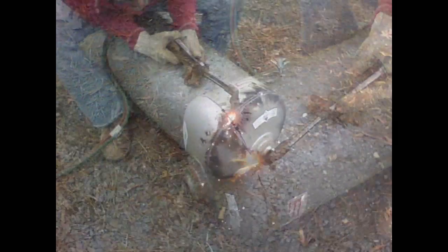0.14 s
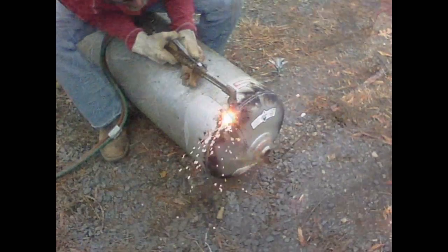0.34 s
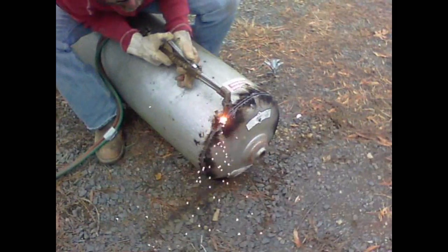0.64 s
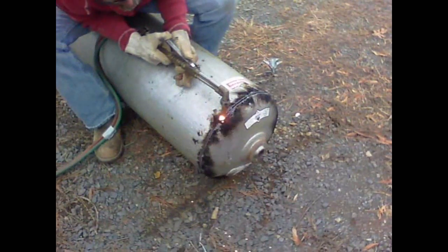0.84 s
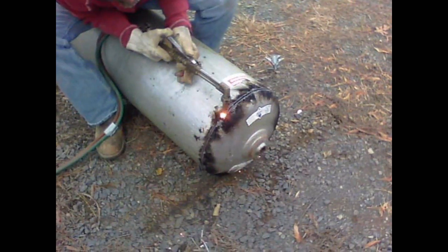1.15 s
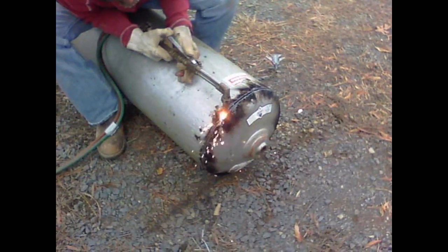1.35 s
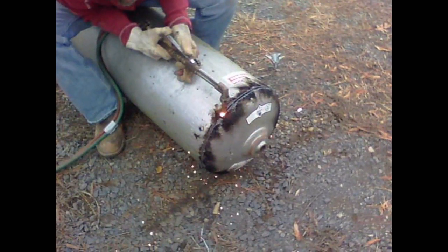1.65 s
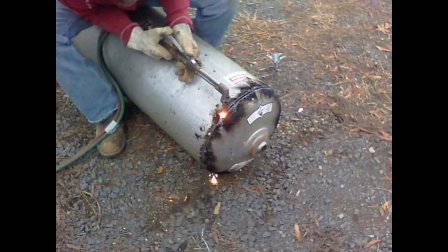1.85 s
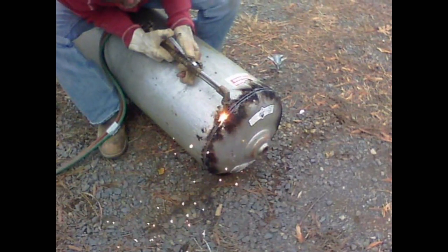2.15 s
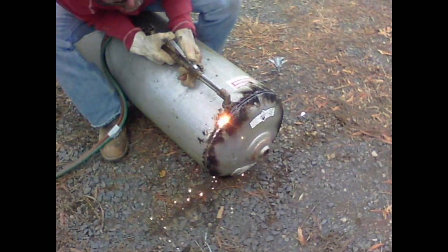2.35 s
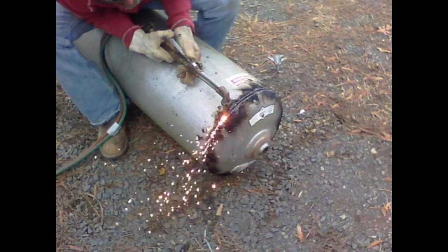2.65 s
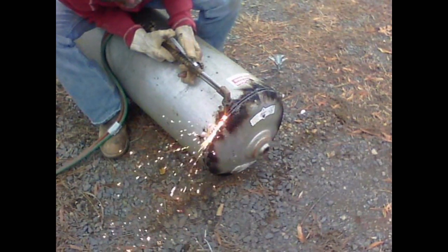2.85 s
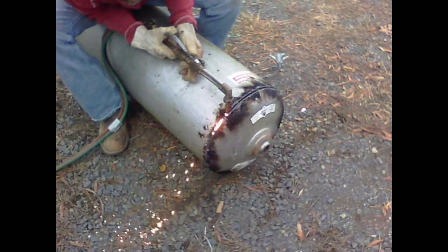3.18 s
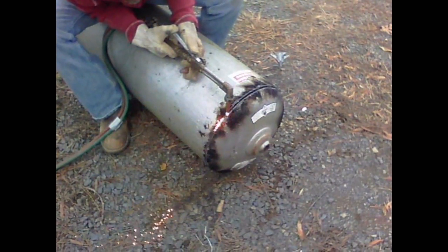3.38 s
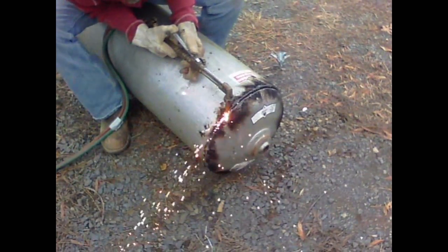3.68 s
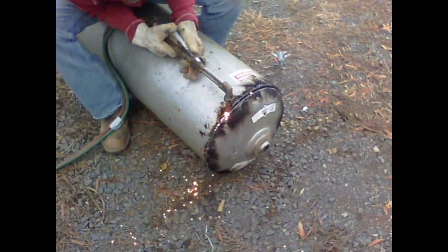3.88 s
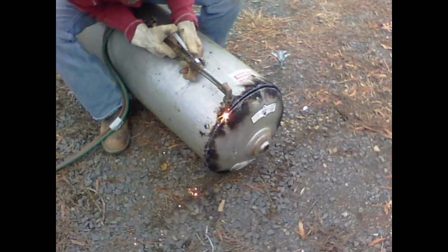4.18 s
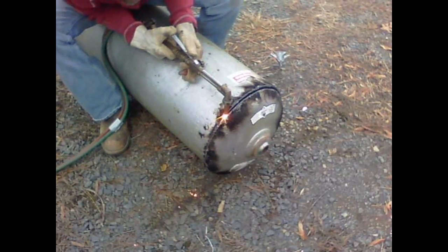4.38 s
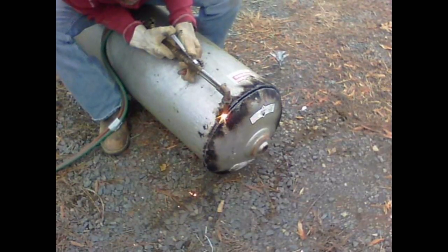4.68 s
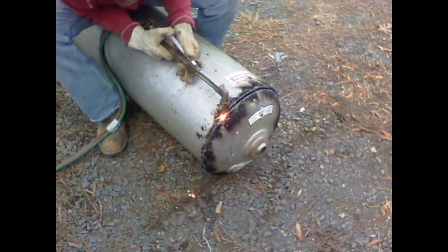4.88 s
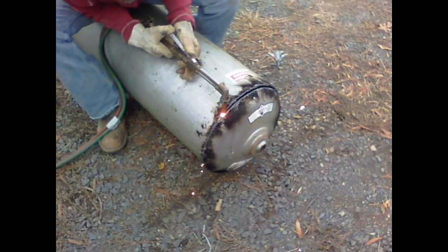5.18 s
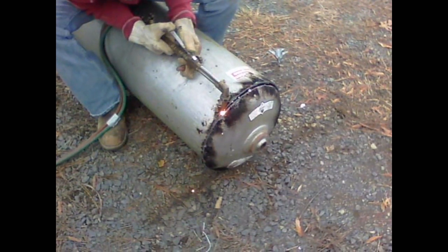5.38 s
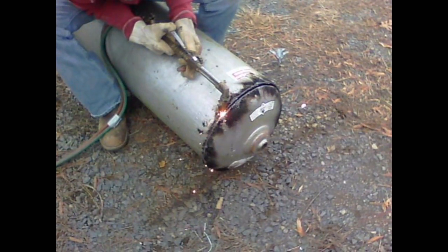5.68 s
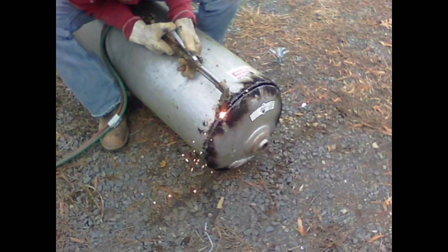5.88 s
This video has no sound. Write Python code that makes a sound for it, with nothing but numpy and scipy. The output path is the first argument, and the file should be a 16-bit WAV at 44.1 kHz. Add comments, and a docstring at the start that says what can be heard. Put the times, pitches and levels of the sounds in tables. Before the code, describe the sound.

Outdoors, over a faint low hum, a torch cuts a hollow steel tank with a rough hiss and sharp spits of slag. The hiss swells, then falls away to a gently blowing flame while sparks tick and the tank sings faintly three times. Then the hiss comes back strongly and the tank booms and thuds as it opens. The close, narrow-sounding microphone dulls the highs and crackles on the loudest moments.

```python
"""An oxy-fuel torch cuts the end off a steel tank in a yard, over a low hum. The oxygen jet hisses, roars in
the kerf and spits slag, coloured by the hollow tank; from 2.6 s it labours and grows louder. At 3.9 s the
oxygen is shut off for a second: the flame blows on, sparks tick and the tank sings three times. Then the
jet returns, breaks through into the tank at 5 s, and the low end booms and thuds. The camera's
narrow-band microphone dulls the top and distorts on the loudest stretches."""
import sys
import numpy as np
from scipy.fft import rfft, irfft, next_fast_len
from scipy.io import wavfile
from scipy.ndimage import map_coordinates

SR = 44100
rng = np.random.default_rng(int(sys.argv[2]) if len(sys.argv) > 2 else 0)


def generate_wav(sig):
    """Save sig (samples, or channels by samples) to the path in sys.argv[1] as 16-bit PCM at SR."""
    pcm = np.round(np.clip(np.atleast_2d(sig).T, -1, 1) * 32767).astype(np.int16)
    wavfile.write(sys.argv[1], SR, pcm)


N = 265834

# The background hum. Each row: pitch in Hz, level in dB.
HUM_TONES = [(59, -45), (72, -46), (145, -50), (216, -51)]
# Tone colours of the gas, and the microphone's response. Each row: frequency in Hz, relative level in dB.
FLAME_SPECTRUM = [(100, -6), (300, -5), (550, 1), (820, -1.5), (1000, -1.5), (1250, -2.5), (1680, -10.5),
                  (1920, -5.5), (2150, -11), (2450, -7.5), (3800, -13.5), (5000, -22)]
RUMBLE_SPECTRUM = [(15, -20.5), (45, -5), (60, -3), (72, 7), (88, 0.5), (110, -7.5), (140, -4.5),
                   (185, -11.5), (300, -19.5), (500, -24.5), (1500, -68)]
HISS_SPECTRUM = [(300, -25.5), (900, -25), (1700, -12.5), (2200, -6), (2700, -2), (3400, -1.5), (3900, 0.5),
                 (4600, 0.5), (5200, 1), (6000, -7)]
ROAR_SPECTRUM = [(150, -19.5), (330, -11.5), (400, 1), (560, -3), (810, -10.5), (1000, -5.5), (1250, -1.5),
                 (1680, -6.5), (1950, -1), (2200, -8), (3000, -3), (5000, -12)]
MIC_RESPONSE = [(20, -1), (5050, 1.5), (5250, -3.5), (5450, -12), (5600, -7), (5750, -17.5), (5950, -86.5),
                (6300, -110)]
# The tank's ringing modes. Each row: frequency in Hz, width in Hz, level in dB over the direct sound.
TANK_MODES = [(667, 14, 11.5), (753.7, 9.7, 17.5), (862, 14, 14.5), (983, 17, 5), (1120, 11, 5.5),
              (1204, 36, 5.5), (1292, 28, 6), (1406, 19, 9), (1535, 23, 9), (1930, 74, 1), (2424, 130, 1.5),
              (2980, 74, -2), (2970, 16, 7), (3470, 20, -11), (3835, 150, 1.5), (4313, 36, -14),
              (4670, 62, -6.5)]
SHELL_HZ = np.linspace(1600, 5400, 48) + rng.normal(0, 30, 48)  # the shell's crowded higher modes
# The air in the tank, closed and then cut open (higher and more damped).
# Each row: frequency in Hz, width in Hz, relative level in dB.
CLOSED_AIR_MODES = [(227.9, 13, 3.5), (261.3, 53, -9)]
OPEN_AIR_MODES = [(250.4, 61, 4), (305, 110, -9.5)]
# Notes the flame draws from the tank. Each row: centre in seconds, level in dB, length in seconds.
SUNG_NOTES = [(4.096, -52, 0.11), (4.36, -45, 0.15), (4.615, -49, 0.1)]
# Bursting sparks. Each row: start in seconds, relative level in dB.
SPARK_TICKS = [(4.252, -38), (4.364, -39), (4.489, -35), (4.623, -30.5)]
# Blasts of gas into the tank. Each row: centre in seconds, length in seconds, change of the boom in dB,
# thud level in dB, thud pitch in Hz.
GAS_BLASTS = [(0.475, 0.12, 7.5, -30.5, 72), (1.537, 0.22, 2, -35, 130), (2.08, 0.35, 4, -38, 125),
              (2.862, 0.079, 14, -36, 115), (3.238, 0.099, 6, -35, 70), (5.228, 0.13, 5, -29.5, 133.5),
              (5.445, 0.11, 1, -25, 75.7), (5.909, 0.08, -2, -16.5, 69.8), (5.98, 0.11, 7.5, -16.5, 134)]
# Short rushes of noise: slag spits, the oxygen coming back on, the tank roaring as it opens.
# Each row: start in seconds, level in dB, length in seconds, band centre and width in Hz.
KERF_GUSHES = [(0.098, -28.5, 0.026, 4000, 3000), (0.41, -25.5, 0.014, 4100, 2970),
               (0.463, -20.5, 0.04, 4180, 2000), (0.649, -24, 0.017, 4540, 2000),
               (0.98, -21, 0.02, 3900, 3040), (1.586, -21.5, 0.023, 3060, 4000),
               (2.045, -29, 0.04, 1300, 1500), (2.35, -33, 0.019, 4000, 3000),
               (2.618, -21.5, 0.031, 3800, 3000), (2.952, -19, 0.025, 3500, 4000),
               (2.954, -25, 0.021, 1260, 200), (3.244, -17.5, 0.016, 3000, 4080),
               (3.41, -25.5, 0.06, 1394, 2000), (3.605, -12.5, 0.029, 3960, 3000),
               (3.899, -17.5, 0.012, 4400, 2000), (4.804, -33, 0.078, 2900, 3030),
               (4.88, -16.5, 0.007, 4200, 2000), (4.919, -24, 0.016, 2680, 600),
               (4.947, -23, 0.027, 2300, 400), (5.002, -29.5, 0.055, 1300, 252),
               (5.94, -26.5, 0.037, 365, 298)]
# The cut runs smoothly, labours, then resumes after the pause.
# Each row: time in seconds, relative hiss level in dB, relative roar level in dB.
SMOOTH_CUT = [(0.0, -28, -34), (0.32, -26, -33), (0.43, -21.5, -30), (0.78, -24, -35), (2.01, -22.5, -32.5),
              (2.53, -25, -31), (2.56, -24.5, -33)]
LABOURED_CUT = [(2.63, -21.5, -26.5), (2.804, -22.5, -26), (2.946, -20.5, -22.5), (3.28, -18.5, -26),
                (3.326, -21, -33), (3.636, -13, -22), (3.826, -16, -26.5), (3.88, -23.5, -29.5)]
RESUMED_CUT = [(4.9, -23.5, -28), (5.154, -17.5, -31.5), (5.204, -15, -23), (5.438, -16, -29),
               (6.028, -13, -24.5)]

TIME = np.arange(N) / SR


def amp(db):
    """Decibels to gain."""
    return 10 ** (np.asarray(db) / 20)


def unit(x):
    """Scale to rms 1."""
    return x / np.sqrt(np.mean(x ** 2) + 1e-20)


def shape(points, hz):
    """An EQ curve: the gain of (Hz, dB) points joined on a log axis."""
    corner_hz, db = np.transpose(points)
    return amp(np.interp(np.log(hz + 1), np.log(corner_hz), db))


def wobble(rate):
    """A smooth random curve, rate knots a second."""
    return map_coordinates(rng.standard_normal(int(N * rate / SR) + 4), [np.arange(N) * rate / SR])


def swell(centre_s, length_s):
    """A smooth hump of height 1."""
    return np.exp(-(2 * (TIME - centre_s) / length_s) ** 2)


def filtered(x, response):
    """Filter x with a gain given as a function of frequency."""
    size = next_fast_len(N + SR // 2)
    return irfft(rfft(x, size) * response(np.fft.rfftfreq(size, 1 / SR)), size)[:N]


def noise(response):
    """Coloured noise of rms 1."""
    return unit(filtered(rng.standard_normal(N), response))


def resonance(modes, hz):
    """Summed power response of (Hz, width, dB) modes."""
    return sum(np.abs(amp(db) * hz * width / (centre * centre - hz * hz + 1j * hz * width)) ** 2
               for centre, width, db in modes)


def saturated(x, ceiling, hardness):
    """Round off the peaks at the ceiling."""
    return x / (1 + np.abs(x / ceiling) ** hardness) ** (1 / hardness)


def oxygen_flow(shut_s=3.917, open_s=4.88, bleed_db_per_s=194, build_db_per_s=319, leak_db=-31.5):
    """Share of full flow: with the lever up the hose bleeds to a leak; pressed again, the jet builds."""
    db = np.maximum(bleed_db_per_s * (shut_s - TIME), build_db_per_s * (TIME - open_s))
    return np.minimum(amp(np.minimum(db, 0)) + amp(leak_db), 1)


def breakthrough(start_s=5.0, rise_s=0.12):
    """How far the jet has broken through into the tank, 0-1."""
    return np.clip((TIME - start_s) / rise_s, 0, 1)


def cut_envelopes():
    """Gains of the jet's hiss and the kerf's roar with the lever fully down."""
    times, *levels = np.transpose(np.vstack([SMOOTH_CUT, LABOURED_CUT, RESUMED_CUT]))
    return [amp(np.interp(TIME, times, db)) for db in levels]


def hum():
    """A bed of low, slightly unsteady tones."""
    tones = np.zeros(N)
    for hz, db in HUM_TONES:
        phase = 2 * np.pi * np.cumsum(hz + 1.1 * wobble(5.6)) / SR
        tones += amp(db) * unit(np.sin(phase) * amp(2.2 * wobble(3.5)))
    return tones


def air_puffs():
    """Moving air pushes on the microphone in the deepest bass, more so when the kerf roars."""
    _, roar_gain = cut_envelopes()
    push = np.hypot(amp(-41.5), 0.25 * oxygen_flow() * roar_gain)
    air = noise(lambda hz: shape([(4, -25), (12, 0), (32, -2), (50, -9), (120, -35), (600, -80)], hz))
    return push * amp(1.6 * wobble(1.7)) * air


def flame():
    """The preheat flame blows softly; its turbulent rumble grows with the oxygen and the breakthrough."""
    blow = amp(-45.5 + 0.7 * wobble(40)) * noise(lambda hz: shape(FLAME_SPECTRUM, hz))
    rumble_db = -37 - 5 * (1 - oxygen_flow()) + 9 * breakthrough() + 1.1 * wobble(6.4)
    return blow + amp(rumble_db) * noise(lambda hz: shape(RUMBLE_SPECTRUM, hz))


def tank_singing(pitch_hz=992, sag_hz_per_s=110):
    """The flame blows across the edge of the cut and one tank resonance sings, a rough, sagging tone."""
    tones = np.zeros(N)
    for centre_s, db, length_s in SUNG_NOTES:
        hz = pitch_hz - sag_hz_per_s * (TIME - centre_s) + 13 * wobble(70)
        rough_tone = np.sin(2 * np.pi * np.cumsum(hz) / SR) * amp(2 * wobble(50))
        tones += amp(db) * swell(centre_s, length_s) * unit(rough_tone)
    return tones


def sparks(ring_hz=3800, decay_s=0.00021):
    """Each spark bursts with a tick of a cycle or two."""
    ticks = np.zeros(N + SR)
    t = np.arange(SR // 100) / SR
    tick = np.exp(-t / decay_s) * np.sin(2 * np.pi * ring_hz * t)
    for start_s, db in SPARK_TICKS:
        ticks[round(start_s * SR):][:len(t)] += amp(db + 8.5) * tick
    return ticks[:N]


def blast_thuds(relative_width=0.67):
    """Each blast of gas into the tank thuds: a short swell of low noise."""
    thuds = np.zeros(N)
    for centre_s, length_s, _, db, pitch_hz in GAS_BLASTS:
        band = [(pitch_hz, relative_width * pitch_hz, 0)]
        thuds += amp(db) * swell(centre_s, length_s) * noise(lambda hz: resonance(band, hz))
    return thuds


def gushes():
    """Short rushes of gas or slag: each has its own band of noise, swells fast and dies away."""
    bursts = np.zeros(N + SR)
    t = np.arange(SR // 4) / SR
    hz = np.fft.rfftfreq(len(t), 1 / SR)
    for start_s, db, length_s, centre_hz, width_hz in KERF_GUSHES:
        band = np.sqrt(resonance([(centre_hz, width_hz, 0)], hz))
        rush = unit(irfft(rfft(rng.standard_normal(len(t))) * band, len(t)))
        age = 2 * t / length_s
        bursts[round(start_s * SR):][:len(t)] += amp(db) * age * np.exp(1 - age) * rush
    return bursts[:N]


def tank_air(modes):
    """Noise of rms 1 ringing in the hollow of the tank."""
    low_band = [(100, -38), (205, -2), (320, -3), (550, -14)]
    return noise(lambda hz: np.sqrt(resonance(modes, hz)) * shape(low_band, hz))


def tank_boom():
    """The jet makes the tank's air boom: it surges with blasts, and is louder and higher once cut open."""
    opened = breakthrough()
    surge_db = sum(db * swell(centre_s, length_s) for centre_s, length_s, db, _, _ in GAS_BLASTS)
    boom_db = -36 + 7.5 * opened + surge_db + 1.76 * wobble(12)
    air = np.sqrt(1 - opened) * tank_air(CLOSED_AIR_MODES) + np.sqrt(opened) * tank_air(OPEN_AIR_MODES)
    return np.sqrt(oxygen_flow()) * amp(boom_db) * air


def wall_reflection(x, delay_s=0.001634, sway=0.028):
    """A bounce off the tank wall combs the sound; its path shifts a little as the hand moves."""
    strength = 0.29 * swell(centre_s=3.8, length_s=3.3)  # strongest while the tip is tilted at the wall
    bounce = np.interp(TIME - delay_s * (1 + sway * wobble(2)), TIME, x)
    return (x + strength * bounce) / np.sqrt(1 + strength ** 2)


def turbulence(spectrum, flutter_db, flutter_rate, shell_width_hz=11, shell_db=2):
    """Rushing gas of rms 1, heard directly and through the tank's resonances."""
    rush = rng.standard_normal(N) * amp(flutter_db * wobble(flutter_rate))
    grid_hz = np.linspace(1, SR / 4, 6000)
    ring = resonance(TANK_MODES + [(hz, shell_width_hz, shell_db) for hz in SHELL_HZ], grid_hz)
    return unit(filtered(rush, lambda hz: shape(spectrum, hz) * np.sqrt(1 + np.interp(hz, grid_hz, ring))))


def oxygen_jet():
    """The jet hisses and roars; molten steel chokes the kerf unevenly, so both sputter together."""
    hiss_gain, roar_gain = cut_envelopes()
    sputter = unit(amp(0.45 * wobble(45) + 0.45 * wobble(170)))
    hiss = amp(0.58) * hiss_gain * turbulence(HISS_SPECTRUM, flutter_db=0.14, flutter_rate=1500)
    waver = amp(0.3 + 0.7 * wobble(12))
    roar = waver * roar_gain * turbulence(ROAR_SPECTRUM, flutter_db=1.54, flutter_rate=360)
    return oxygen_flow() * sputter * (hiss + roar)


def scene():
    """The cut up front, with gushes, sparks, flame and hum around it, in mono."""
    cut = wall_reflection(oxygen_jet() + tank_boom())
    return (cut + gushes() + blast_thuds() + sparks() + flame() + tank_singing() + air_puffs() + hum())[None]


def record(dry):
    """The camera rounds off peaks in a narrow band; what still overshoots splashes crackle above it."""
    narrow = filtered(dry[0], lambda hz: shape(MIC_RESPONSE, hz))
    rounded = saturated(narrow, ceiling=0.6, hardness=6.1)
    dulled = filtered(rounded, lambda hz: shape([(5500, 1), (5950, -55), (6300, -110)], hz))
    crackling = saturated(dulled, ceiling=0.53, hardness=24)
    return filtered(crackling, lambda hz: hz < 15800)[None]


dry = scene()
out = record(dry)
generate_wav(out)
```